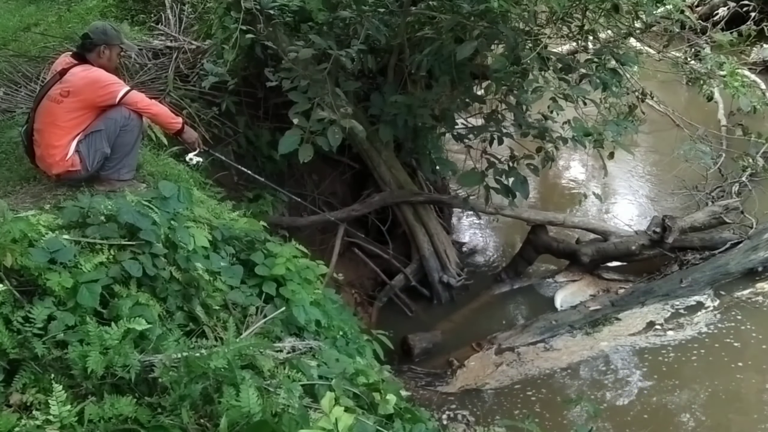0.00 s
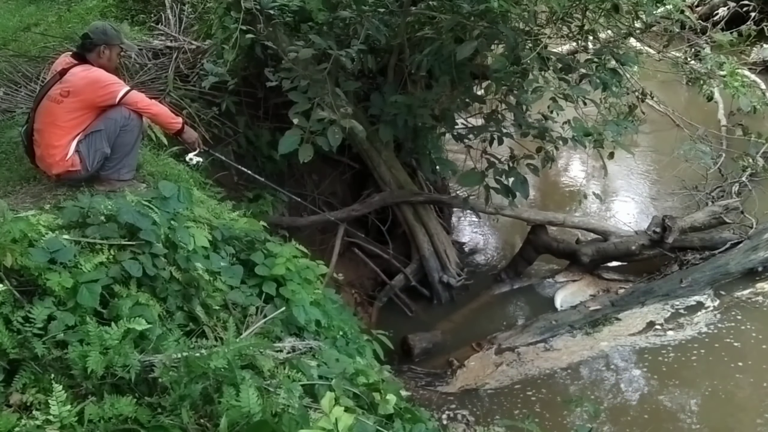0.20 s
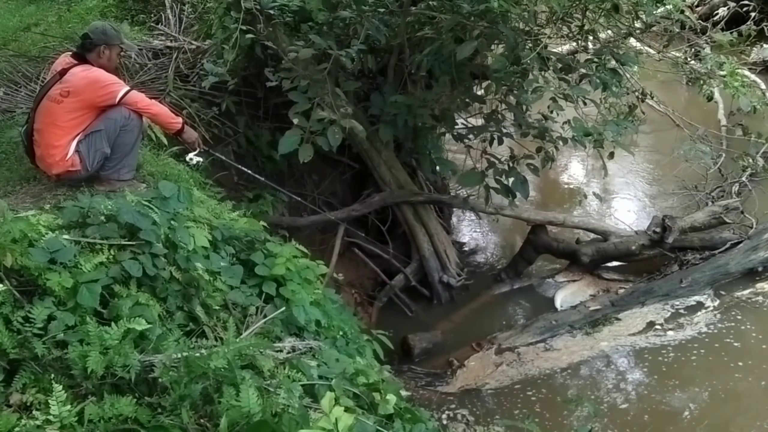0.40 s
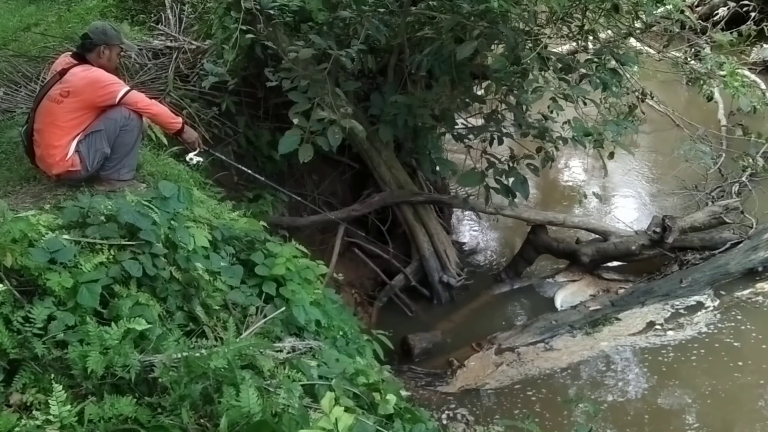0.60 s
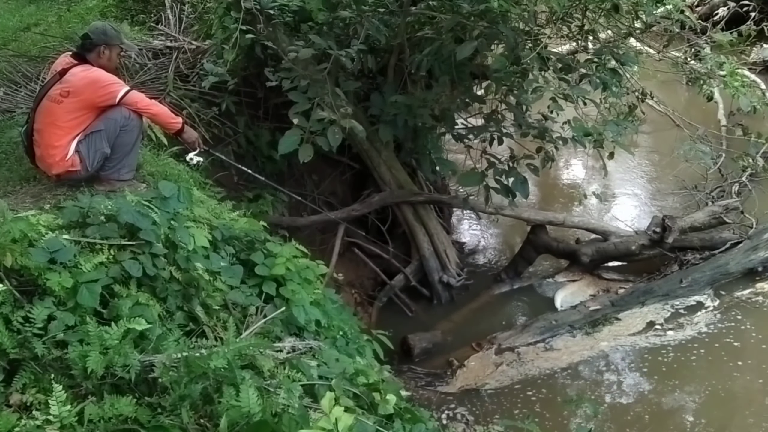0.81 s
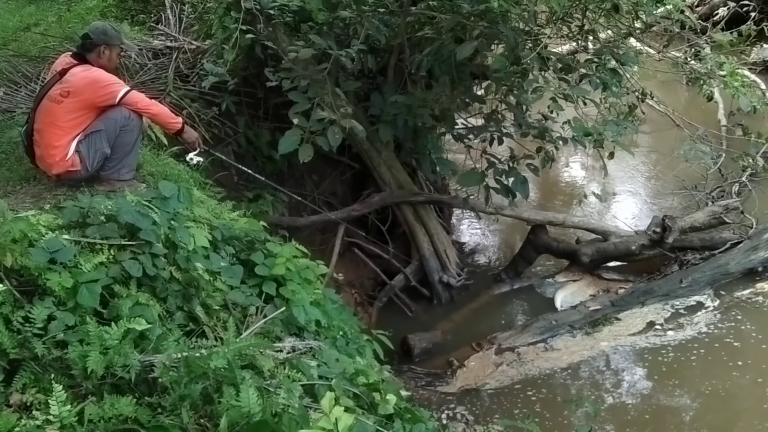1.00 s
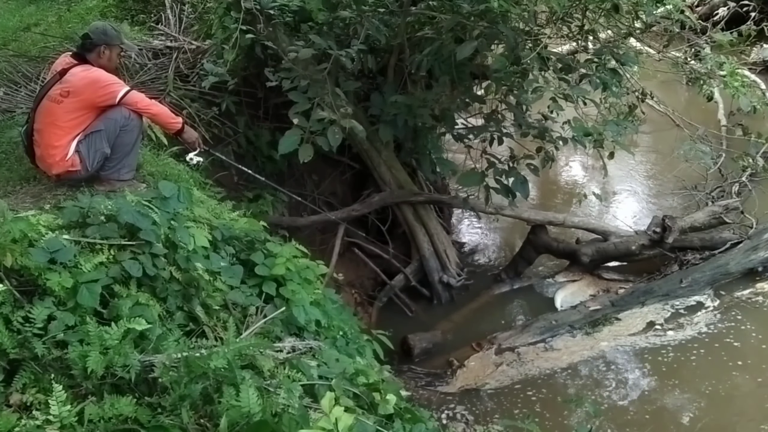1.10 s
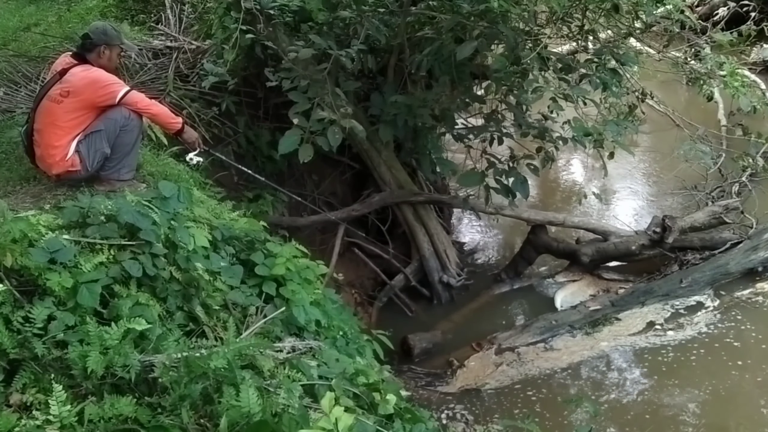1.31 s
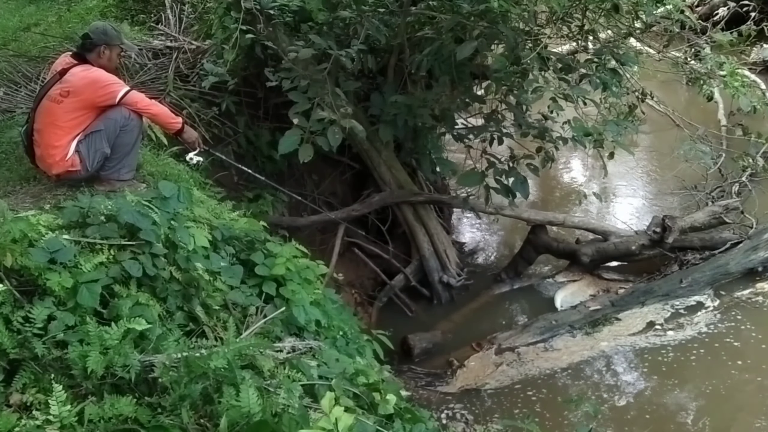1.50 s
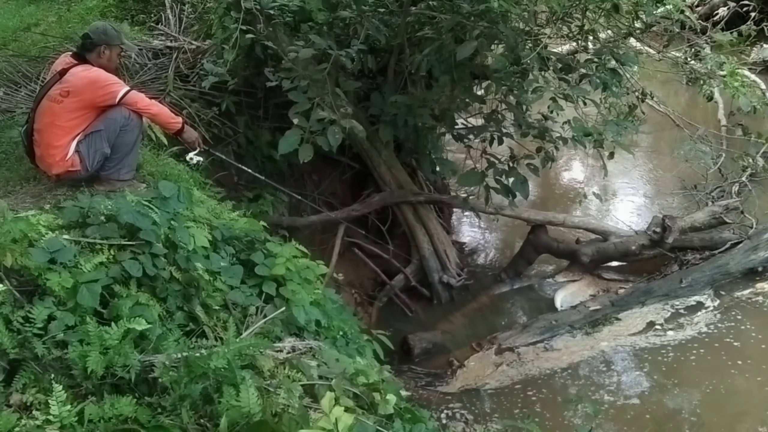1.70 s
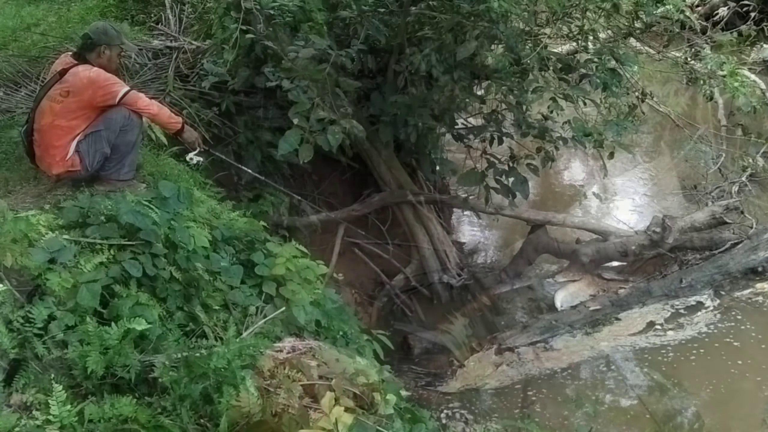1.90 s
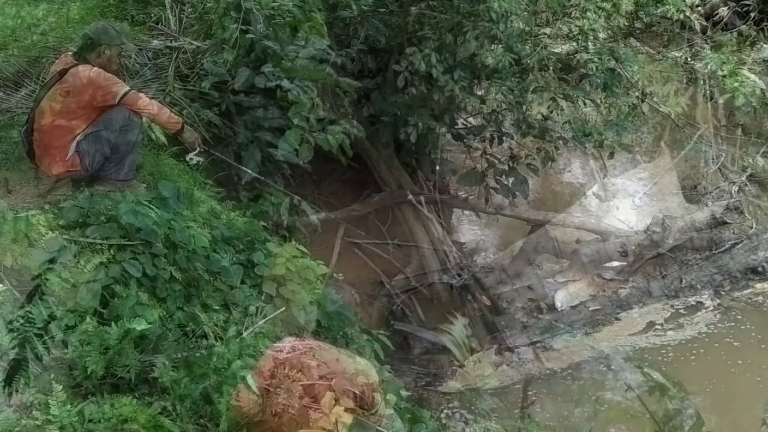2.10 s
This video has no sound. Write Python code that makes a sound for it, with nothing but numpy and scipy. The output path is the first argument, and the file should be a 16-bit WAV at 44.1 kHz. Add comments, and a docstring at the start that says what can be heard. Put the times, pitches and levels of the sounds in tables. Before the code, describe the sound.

Three short rising animal whoops, evenly spaced, ring off the trees after the tail of an earlier one; then only high insect chirps, buzzes and trills, faint hoots and low hum remain, outdoors, heard from some distance.

```python
"""The tail of an earlier whoop is dying as insects chirp and trill in narrow treble bands over a low wavering hum.
A riverside animal then gives three rising whoops, partials on one glide, that ring on among the trees.
As the third whoop ends, the whole level dips briefly and returns; the insects swell and fade throughout.
Sweeping sines make the falling chirps, filtered noise the buzz, ticks, trills, singer, hum and air.
Faint far peeps and soft low hoots, short gliding tones, come and go to the end."""
import sys
import numpy as np
from scipy import signal
from scipy.fft import rfft, irfft, next_fast_len
from scipy.io import wavfile
from scipy.ndimage import uniform_filter1d, map_coordinates

SR = 44100
rng = np.random.default_rng(int(sys.argv[2]) if len(sys.argv) > 2 else 0)


def int16_out(signal):
    """Quantize to a 16-bit WAV file."""
    q = np.round(np.clip(np.atleast_2d(signal).T, -1, 1) * 32767)
    wavfile.write(sys.argv[1], SR, q.astype(np.int16))


N = 97020  # samples, 2.2 s
PAD = SR // 2  # spare samples either side, so sounds can start early or ring past the end


def amp(db):
    """dB to gain."""
    return 10 ** (np.asarray(db) / 20)


def unit(x):
    """Scaled to rms 1."""
    return x / np.sqrt(np.mean(x ** 2) + 1e-20)


def along(points, hz):
    """Reads (Hz, value) points on a log frequency axis."""
    point_hz, value = np.transpose(points)
    return np.interp(np.log(hz + 1), np.log(point_hz + 1), value)


def curves(rows):
    """One value per sample for each column after the time in seconds."""
    s, *columns = np.transpose(rows)
    return [np.interp(np.arange(N) / SR, s, column) for column in columns]


def wobble(rate, size=N):
    """A smooth random curve with rate knots a second."""
    knots = rng.standard_normal(int(size * rate / SR) + 4)
    return map_coordinates(knots, [np.arange(size) * rate / SR])


def sine(hz, phase=0):
    """A sine that follows a pitch curve in Hz."""
    return np.sin(2 * np.pi * np.cumsum(hz) / SR + phase)


def filtered(x, response):
    """Multiplies the spectrum of x by a response of frequency."""
    m = next_fast_len(len(x) + SR // 2)
    return irfft(rfft(x, m) * response(np.fft.rfftfreq(m, 1 / SR)), m)[:len(x)]


def band(centre_hz, width_hz, steep=1.0):
    """Noise of rms 1 through one resonance; a higher steep gives sharper skirts."""
    def resonance(f):
        return 1 / (1 + np.abs(2 * (f - centre_hz) / width_hz) ** (2 * steep))
    return unit(filtered(rng.standard_normal(N), resonance))


REACH_S = .46  # beyond this the echoes die away quickly


def echoes(x, t60s, rise_s):
    """Trees answer with a noise tail that builds up, then dies at its own rate for each frequency."""
    hz, t, z = signal.stft(rng.standard_normal(SR), SR, nperseg=256)
    decay = amp(-60 * t / along(t60s, hz)[:, None])
    build = 1 - np.exp(-t / rise_s)
    tail = signal.istft(z * decay * build * np.exp(-(t / REACH_S) ** 4), SR, nperseg=256)[1]
    # scaled by the tail's energy near 1470 Hz
    energy = np.mean(amp(-120 * t / along(t60s, SR / 30)) * build ** 2) * len(tail)
    return signal.fftconvolve(x, tail / np.sqrt(energy))[:len(x)]


# decay of the forest's echoes: freq_hz [Hz], t60_s [s]
FOREST_DECAY = [(400, 1), (800, .5), (1250, 0.46), (1550, 0.5), (1800, 0.62), (2500, .4), (8000, .4)]
FOREST_DB, FOREST_RISE_S = -8.5, 0.01
# the calls: start_s [s], length_s [s], level_db [dB]
WHOOP_CALLS = [(-.14, 0.13, -6), (0.21, 0.1392, 1), (.55, .14, 1.5), (0.947, 0.13, 0.5)]
# rise of one whoop from its start: time_s [s], pitch_hz [Hz]
WHOOP_GLIDE = [(0, 440), (.014, 505), (.03, 575), (.042, 630), (.06, 676), (.075, 715), (.09, 752),
               (.105, 785), (.122, 845), (.135, 870)]
# throat and near echoes colour partials 1, 2 and 3: freq_hz [Hz], level_db [dB, relative]
FIRST_PARTIAL = [(430, -52), (550, -34), (620, -48), (705, -29), (775, -48), (855, -28), (880, -36)]
SECOND_PARTIAL = [(860, -42), (1020, -40), (1130, -32), (1200, -20), (1270, -16), (1350, -14), (1375, -17),
                  (1400, -14), (1430, -23), (1460, -15), (1490, -19), (1510, -16), (1545, -24), (1575, -34),
                  (1620, -23), (1680, -29), (1750, -34)]
THIRD_PARTIAL = [(1500, -75), (1800, -66), (1880, -50), (2030, -44), (2110, -55), (2200, -45), (2290, -59),
                 (2450, -63), (2600, -59)]
# echo tone, favouring the top of the glide: freq_hz [Hz], gain_db [dB]
ECHO_TONE = [(400, -9.5), (600, -3.5), (800, -1), (1100, -4.5), (1300, -6), (1500, 4), (1650, 8.5),
             (1800, 12.5), (2200, 0.5), (2600, 16.5)]
LEAD_S = .009  # the voice murmurs at its lowest pitch before the glide
ATTACK_S, RELEASE_S, SHIMMER_DB = .012, .012, .8
CRACK_DB, CRACK_PEAK_S, CRACK_WIDTH_S, RASP_DB = -35.5, .03, 0.0072, -39
BANK_DELAY_S, BANK_DB, BANK_T60_S = .19, -20, .3  # a blurred late echo from across the water


def whoop_voice(t):
    """Three partials ride one rising glide; the voice cracks and rasps as it starts."""
    pitch = np.interp(t, *np.transpose(WHOOP_GLIDE))
    turn = 2 * np.pi * np.cumsum(pitch) / SR
    voice = np.zeros(len(t))
    for k, table in enumerate((FIRST_PARTIAL, SECOND_PARTIAL, THIRD_PARTIAL), start=1):
        level_db = uniform_filter1d(along(table, k * pitch), size=100)
        voice += amp(level_db + SHIMMER_DB * wobble(90, size=len(t))) * np.sin(k * turn)
    # the crack sounds at one and a half times the pitch
    crack = amp(CRACK_DB) * np.exp(-((t - CRACK_PEAK_S) / CRACK_WIDTH_S) ** 2) * np.sin(3 * turn / 2)
    roughness = np.exp(-(t / CRACK_PEAK_S) ** 4) * wobble(500, size=len(t))
    return voice + crack + amp(RASP_DB) * roughness * np.sin(2 * turn)


def whoops():
    """Each call stirs its own forest tail and a later, blurred echo."""
    out = np.zeros(N + 2 * PAD)
    for start, length, db in WHOOP_CALLS:
        t = np.arange(round(-LEAD_S * SR), round(length * SR)) / SR
        shape = np.clip((t + LEAD_S) / ATTACK_S, 0, 1) * np.clip((length - t) / RELEASE_S, 0, 1)
        dry = np.zeros(len(out))
        dry[PAD + round((start - LEAD_S) * SR):][:len(t)] = np.sqrt(2) * amp(db) * shape * whoop_voice(t)
        far = filtered(dry, lambda f: amp(along(ECHO_TONE, f)))
        late = echoes(np.roll(far, round(BANK_DELAY_S * SR)), [(1500, BANK_T60_S)], FOREST_RISE_S)
        forest = echoes(far, FOREST_DECAY, FOREST_RISE_S)
        out += dry + amp(FOREST_DB) * forest + amp(BANK_DB) * late
    return out[PAD:PAD + N]


# alternating slow and fast chirp runs: first_s [s], end_s [s], interval_s [s]
CHIRP_RUNS = [(.012, .29, .052), (.32, .75, .0376), (.784, 1.28, .053), (1.307, 1.7, .038),
              (1.73, 2.2, .0545)]
SWEEP_TOP_HZ, SWEEP_END_HZ, SWEEP_S = 3831, 3185.5, .03
REPEAT_S, REPEAT_DB = .019, -8.5  # every chirp returns as a weaker echo shortly after
SWEEP_WET_DB, SWEEP_T60_S, SWEEP_RISE_S = -2.5, .25, 0.0091


def sweeping_insect():
    """Falling sine chirps, slightly uneven in pitch and level, blurred by echoes."""
    u = np.linspace(0, 1, round(SWEEP_S * SR))
    fall_hz = SWEEP_TOP_HZ + (SWEEP_END_HZ - SWEEP_TOP_HZ) * u
    swell = np.sin(np.pi * u) ** 1.56
    dry = np.zeros(N + 2 * PAD)
    for first, end, every in CHIRP_RUNS:
        for s in np.arange(first, end, every):
            hz = fall_hz * (1 + rng.normal(0, 0.0066))
            chirp = amp(rng.normal(0, 1.2)) * swell * sine(hz, phase=rng.uniform(0, 2 * np.pi))
            # the listed time falls 70 % of the way through the chirp
            dry[PAD + round((s - .7 * SWEEP_S) * SR):][:len(u)] += chirp
    near_echo = amp(REPEAT_DB) * np.roll(dry, round(REPEAT_S * SR))
    blur = amp(SWEEP_WET_DB) * echoes(dry, [(1500, SWEEP_T60_S)], SWEEP_RISE_S)
    return unit((dry + near_echo + blur)[PAD:PAD + N])


BUZZ_HZ, BUZZ_WIDTH_HZ = 3824, 160


def buzzing_neighbour():
    """A narrow noise band with a fluttering level."""
    return unit(amp(1.4 * wobble(55)) * band(BUZZ_HZ, BUZZ_WIDTH_HZ, steep=1.5))


# rides before trim: time_s [s], sweep_db [dB], buzz_db [dB]
DRONE_LEVELS = [(0.0, -43, -42.5), (0.04, -42, -34), (0.23, -43.5, -28.5), (0.49, -42.5, -46),
                (0.59, -39, -54.5), (0.62, -42.5, -65), (1.01, -44.5, -73), (1.07, -42.5, -78),
                (1.26, -45, -48.5), (1.34, -43, -32), (1.54, -36.5, -31), (1.88, -47, -60),
                (1.94, -47.5, -82), (1.95, -49.5, -85), (2.2, -55, -84)]
SWEEP_TRIM_DB, BUZZ_TRIM_DB = 2.0, -8.0


def drone():
    """Falling chirps beside a higher buzz, each swelling on its own."""
    sweep_db, buzz_db = curves(DRONE_LEVELS)
    sweep = amp(sweep_db + SWEEP_TRIM_DB) * sweeping_insect()
    return sweep + amp(buzz_db + BUZZ_TRIM_DB) * buzzing_neighbour()


TICK_FIRST_S, TICK_EVERY_S, TICK_SHARP = .04, .04187, 1.6
TICK_HZ, TICK_WIDTH_HZ, TICK_STEEP = 5040, 240, 1.5
TICK_BLUR = .2  # steady sound left between ticks


def ticking_insect():
    """An even beat opens and closes a noise band."""
    beats = (np.arange(N) / SR - TICK_FIRST_S) / TICK_EVERY_S
    beat = np.abs(np.cos(np.pi * beats)) ** TICK_SHARP
    return unit((beat + TICK_BLUR) * band(TICK_HZ, TICK_WIDTH_HZ, steep=TICK_STEEP))


# rides: time_s [s], tick_db [dB], wide_db [dB], thin_db [dB]
TREBLE_LEVELS = [(0.0, -67, -58, -59), (0.05, -78, -68, -77.5), (0.24, -55.5, -51, -46.5),
                 (0.26, -61.5, -58, -53.5), (0.51, -67.5, -70, -71.5), (0.59, -56.5, -60, -57.5),
                 (0.77, -58.5, -68, -65.5), (0.88, -64.5, -70, -72), (0.99, -49.5, -55.5, -57.5),
                 (1.07, -81, -58.5, -63), (1.29, -70, -70, -68), (1.41, -53, -53.5, -53),
                 (1.46, -66.5, -73, -53), (1.48, -54.5, -60, -49), (1.77, -83, -62.5, -62.5),
                 (1.84, -61, -60, -61), (2.0, -55, -62, -56), (2.03, -57.5, -83, -85),
                 (2.12, -67.5, -73, -72.5), (2.2, -72.5, -82, -76)]
WIDE_HZ, WIDE_WIDTH_HZ = 6450, 323
THIN_HZ, THIN_WIDTH_HZ = 7578, 55


def trills():
    """The ticking insect with a wide and a thin trill, two noise bands of wavering level."""
    tick_db, wide_db, thin_db = curves(TREBLE_LEVELS)
    ticks = ticking_insect()
    wide = unit(amp(2.8 * wobble(25)) * band(WIDE_HZ, WIDE_WIDTH_HZ, steep=1.2))
    thin = unit(amp(1.1 * wobble(13)) * band(THIN_HZ, THIN_WIDTH_HZ))
    return amp(tick_db) * ticks + amp(wide_db) * wide + amp(thin_db) * thin


# song pitch, dipping and climbing back twice: time_s [s], pitch_hz [Hz]
SONG_PITCH = [(0, 6970), (.55, 6970), (.62, 6800), (.72, 6970), (1.38, 6970), (1.44, 6820), (1.52, 6980),
              (2.2, 6980)]
# song level: time_s [s], level_db [dB]
SONG_LEVEL = [(0.0, -53.5), (0.09, -64.5), (0.24, -40.5), (0.38, -65.5), (0.51, -84.5), (0.74, -52.5),
              (0.88, -65), (0.98, -41.5), (1.04, -59), (1.31, -72.5), (1.54, -41.5), (1.6, -41),
              (1.64, -56), (1.68, -43.5), (1.7, -51.5), (1.92, -44.5), (1.95, -56), (1.97, -40.5),
              (2.03, -77), (2.2, -91.5)]
SINGER_WIDTH_HZ = 90


def singing_insect():
    """Slow noise times a gliding sine makes a narrow band that follows the pitch."""
    (pitch_hz,), (level_db,) = curves(SONG_PITCH), curves(SONG_LEVEL)
    flutter = amp(3.0 * wobble(25))
    song = band(0, SINGER_WIDTH_HZ) * sine(pitch_hz)
    return amp(level_db) * unit(flutter * song)


# far birds and insects: start_s [s], length_s [s], from_hz [Hz], to_hz [Hz], level_db [dB]
PEEP_NOTES = [(1.515, .1, 1530, 1610, -53), (1.445, .025, 2100, 2100, -62), (1.515, .02, 1950, 1950, -62),
              (1.585, .04, 2100, 2080, -61), (1.945, .035, 1170, 1170, -62), (1.88, .04, 1560, 1560, -66),
              (1.16, .035, 2750, 2650, -56), (1.21, .04, 2820, 2720, -59), (1.46, .04, 2540, 2540, -60),
              (.96, .02, 2550, 2550, -58), (1.69, .03, 4680, 4660, -64), (1.78, .03, 4720, 4700, -61),
              (1.86, .04, 4740, 4720, -61), (2.02, .04, 4700, 4680, -63), (.6, .05, 8560, 8560, -72),
              (1.46, .03, 8240, 8240, -66)]
# soft low hoots and plops, before trim:
# start_s [s], length_s [s], from_hz [Hz], to_hz [Hz], level_db [dB]
HOOT_NOTES = [(.02, .04, 790, 790, -44), (.38, .07, 270, 290, -42), (.81, .05, 280, 300, -44),
              (.86, .05, 720, 720, -49), (.895, .04, 520, 510, -43), (.89, .06, 270, 280, -44),
              (1.16, .07, 285, 290, -48), (1.24, .04, 480, 500, -50), (1.38, .04, 300, 300, -48),
              (1.42, .07, 285, 290, -43), (1.515, .035, 470, 470, -46), (1.59, .045, 280, 295, -42),
              (1.75, .06, 285, 295, -46), (1.88, .045, 290, 295, -47), (1.985, .03, 540, 540, -51),
              (2.02, .07, 295, 290, -46), (2.125, .02, 680, 680, -60), (2.155, .03, 690, 690, -59),
              (2.13, .06, 280, 280, -49)]
HOOT_TRIM_DB = 2.5


def peeps_and_hoots():
    """Short, slightly husky gliding tones under a smooth swell, with forest echoes."""
    out = np.zeros(N)
    for notes, trim_db in ((PEEP_NOTES, 0), (HOOT_NOTES, HOOT_TRIM_DB)):
        for start, length, from_hz, to_hz, db in notes:
            u = np.linspace(0, 1, round(length * SR))
            tone = np.sin(np.pi * u) * sine(from_hz + (to_hz - from_hz) * u)
            out[round(start * SR):][:len(u)] += amp(db + trim_db) * tone
    out *= amp(2.5 * wobble(110))  # huskiness
    return out + amp(-10) * echoes(out, FOREST_DECAY, FOREST_RISE_S)


# low tones: centre_hz [Hz], width_hz [Hz], level_db [dB, relative]
HUM_TONES = [(81, 50, -17), (114, 25, -6.5), (142.3, 13, -4.5), (174, 13, -8), (234, 20, -10),
             (301, 40, -5), (371, 60, -8), (455.8, 150, -13)]
# ride of the summed hum: time_s [s], level_db [dB]
HUM_RIDE = [(0, -45.5), (.3, -47.5), (.7, -47.5), (1.0, -47.5), (1.15, -48), (1.28, -44.5), (1.36, -54),
            (1.5, -41), (1.62, -51.5), (1.72, -53), (1.9, -49.5), (2.2, -50.5)]
HUM_LUMPS_DB = 4.5


def hum():
    """Narrow noise bands make fuzzy low tones that each waver on their own."""
    tones = np.zeros(N)
    for hz, width, db in HUM_TONES:
        tones += amp(db + HUM_LUMPS_DB * wobble(9.42)) * band(hz, width)
    level_db, = curves(HUM_RIDE)
    return amp(level_db) * unit(tones)


# tone of the air: freq_hz [Hz], level_db [dB per Hz, relative]
AIR_TONE = [(20, -20), (60, -10), (300, 0.5), (600, -19), (1500, -24.5), (3000, -26), (4500, -26),
            (5700, -43.5), (7300, -29.5), (8750, -33), (8950, -50), (13000, -45), (15500, -48.5)]
# ride of the air: time_s [s], level_db [dB]
AIR_RIDE = [(0, -55), (1.6, -56.5), (1.75, -60.5), (2.2, -62)]


def air():
    """Faint broad noise, shaped in tone and drifting slowly in level."""
    noise = unit(filtered(rng.standard_normal(N), lambda f: amp(along(AIR_TONE, f))))
    level_db, = curves(AIR_RIDE)
    return amp(level_db + 2.7 * wobble(2.7)) * noise


def scene():
    """All sources, mono."""
    animals = whoops() + peeps_and_hoots()
    insects = drone() + trills() + singing_insect()
    return (animals + insects + hum() + air())[None]


DIP_S, DIP_FALL_S, DIP_DB, DIP_RETURN_S = 1.04, .02, -11, .2
TOP_HZ = 15500


def record(dry):
    """A brief dip of the whole level, then the band limit."""
    bottom_s = DIP_S + DIP_FALL_S
    dip_db, = curves([(DIP_S, 0), (bottom_s, DIP_DB), (bottom_s + DIP_RETURN_S, 0)])
    return filtered(dry[0] * amp(dip_db), lambda hz: hz < TOP_HZ)[None]


dry = scene()
out = record(dry)
int16_out(out)
```